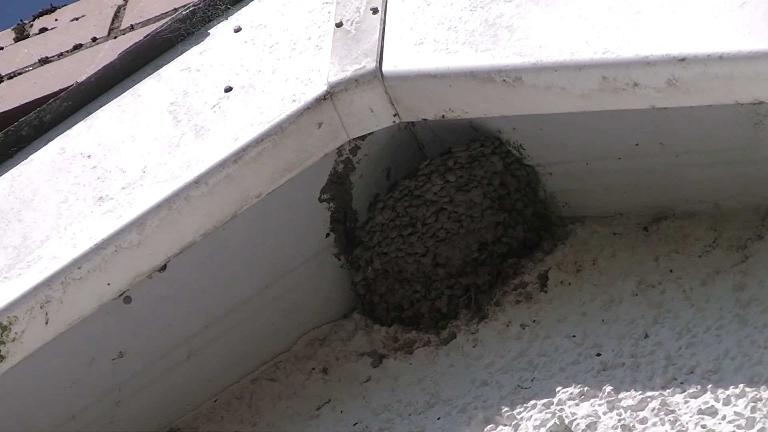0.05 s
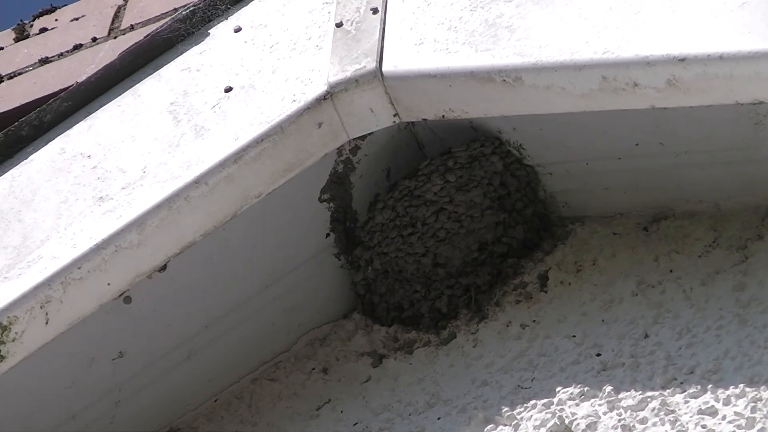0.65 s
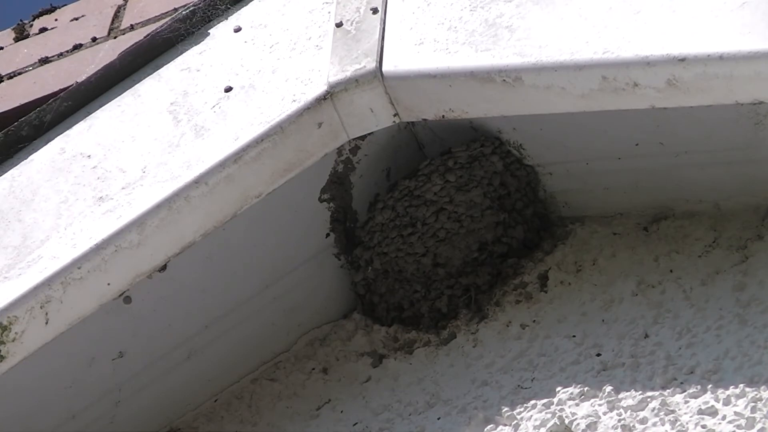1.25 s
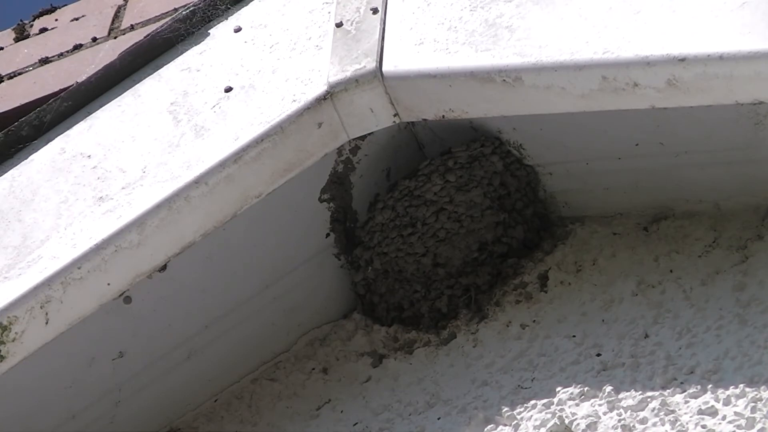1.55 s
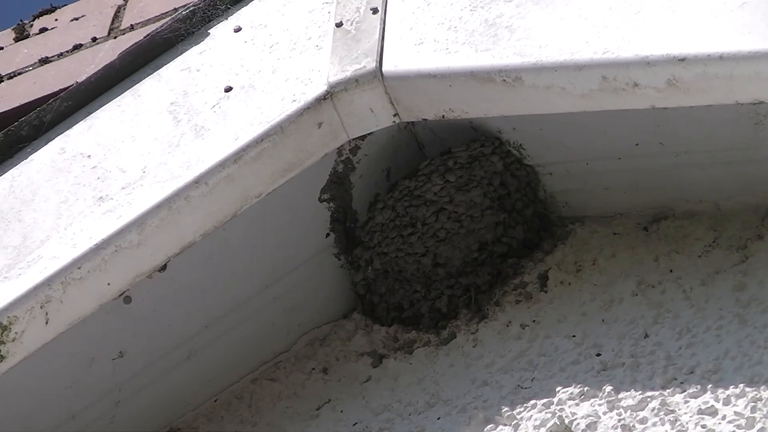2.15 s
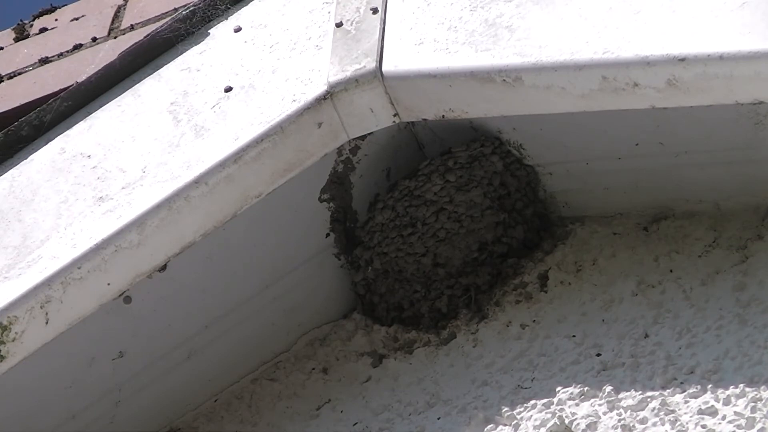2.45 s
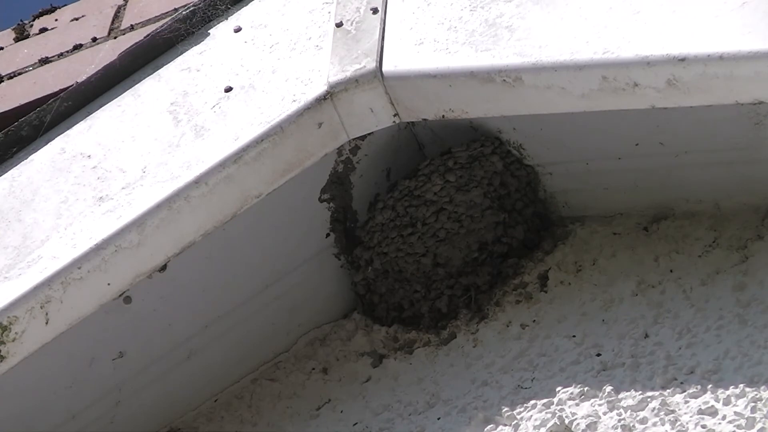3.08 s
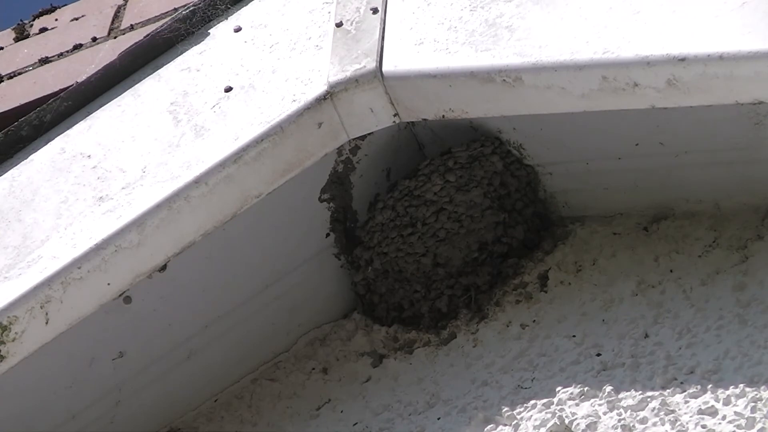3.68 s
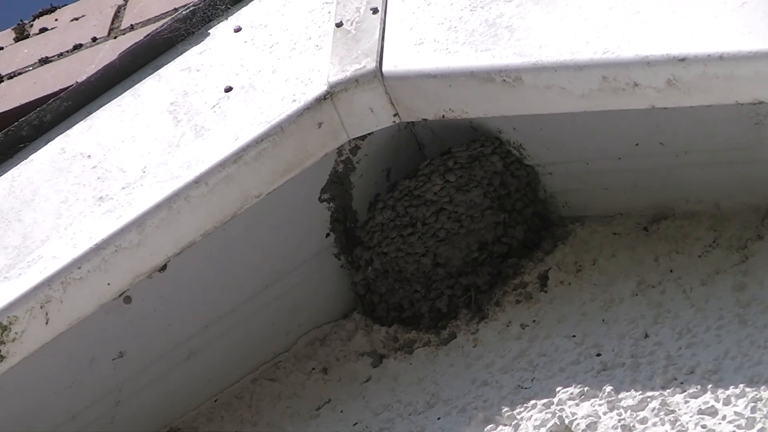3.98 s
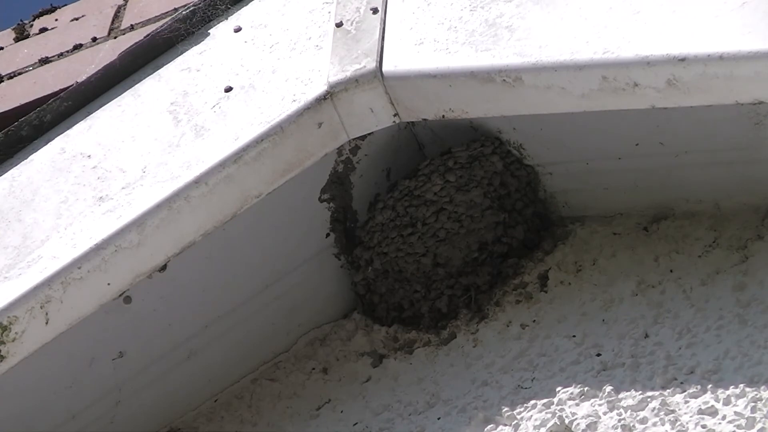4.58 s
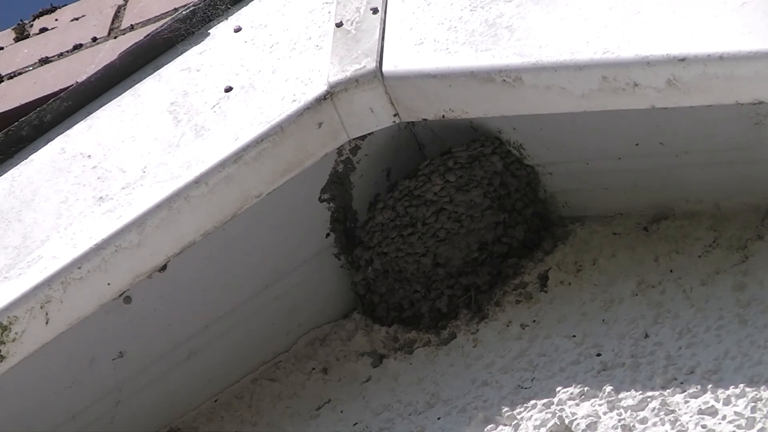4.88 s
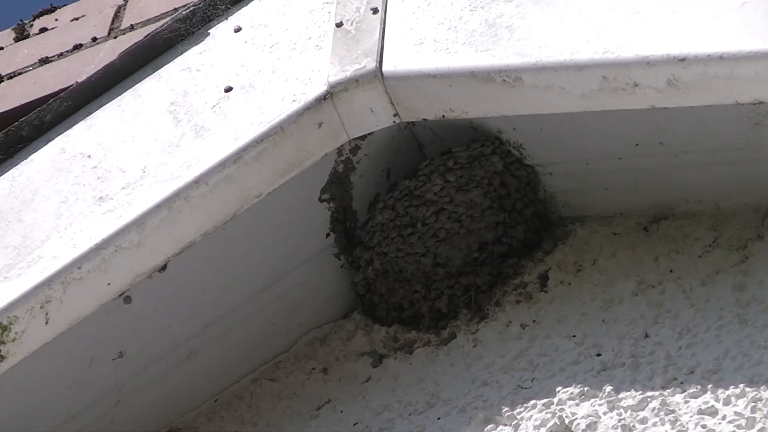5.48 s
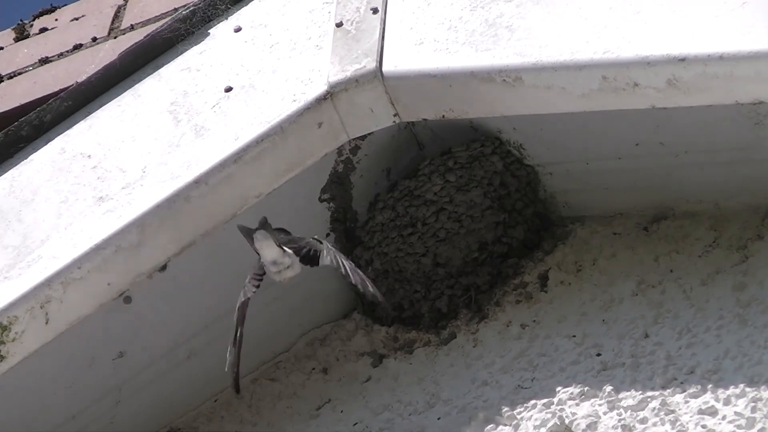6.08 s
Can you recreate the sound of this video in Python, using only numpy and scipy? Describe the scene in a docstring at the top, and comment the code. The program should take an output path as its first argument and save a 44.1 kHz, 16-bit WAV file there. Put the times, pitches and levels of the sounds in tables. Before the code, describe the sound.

Two bursts of quick, high bird twittering over a low machine hum, faint traffic and far birds, ending with a soft flutter.

```python
"""House martins under the eaves

One bird twitters at a mud nest, singing a song of a few motifs twice, the first time ending in a trill.
Its notes are gliding whistles from the two sides of the syrinx. Others rasp farther off among the
houses, and near the end one flutters in and scrabbles onto the nest. Underneath lie a steady low
machine hum, the wash of distant traffic and a light draught on the microphones."""
import sys
import numpy as np
from scipy import signal
from scipy.fft import rfft, irfft, next_fast_len
from scipy.io import wavfile
from scipy.ndimage import uniform_filter1d, map_coordinates

SR = 44100
rng = np.random.default_rng(int(sys.argv[2]) if len(sys.argv) > 2 else 0)


def inscribe(sig):
    """Save sig as 16-bit PCM at rate SR to the path in sys.argv[1].

    A 1-D sig is mono; a 2-D sig holds one channel per row.
    Samples are clipped to [-1, 1] before scaling.
    """
    pcm = np.round(np.clip(np.atleast_2d(sig).T, -1, 1) * 32767)
    wavfile.write(sys.argv[1], SR, pcm.astype(np.int16))


N = 279153

# the machine's tones above the mains note: pitch_hz, level_db
MACHINE_TONES = [(81.5, -50.5), (181, -56.5), (191.2, -41.5), (201.5, -52), (286.7, -55.5)]
# EQ of the traffic wash: frequency_hz, gain_db
WASH_EQ = [(140, -31), (230, -3.5), (400, -1.5), (750, -4.5), (1100, -8), (1600, -13), (2100, -21),
           (2600, -35), (3300, -30.5), (4500, -22), (5600, -24), (8000, -29.5), (12500, -37.5),
           (15600, -83)]
# fader ride on the wash: time_s, level_db
WASH_RIDE = [(0, -37.5), (1.2, -38.5), (2.8, -38), (4.2, -37), (6.33, -37)]
# EQ of the road rumble: frequency_hz, gain_db
RUMBLE_EQ = [(10, -17), (25, -9.5), (45, 2), (65, -12.5), (85, 2), (110, -11), (160, -10.5), (230, -13.5),
             (330, -35.5)]
# stereo image of the noise beds and scrapes: frequency_hz, left_right_correlation
STEREO_LIKENESS = [(30, 0.96), (200, 0.87), (600, 0.9), (1500, 0.63), (3000, 0.69), (4500, 0.44),
                   (8000, 0.49), (12000, -0.11)]
# EQ of the air on the microphones: frequency_hz, gain_db
DRAUGHT_EQ = [(5, -25), (18, 8), (35, 4), (60, -4.5), (90, -18), (130, -15), (300, -53)]
# fader ride on the draught: time_s, level_db
DRAUGHT_RIDE = [(0, -56), (2.8, -37), (4.6, -34), (5.4, -39), (6.33, -27.5)]
# cues for the far birds: start_s, top_pitch_hz, premix_level_db
FAR_CALLS = [(0, 5000, -43), (.06, 5540, -46.5), (.892, 5450, -40.5), (1.68, 5410, -42),
             (2.141, 5900, -43.5), (2.585, 5900, -47), (3.35, 5600, -46), (3.632, 5400, -42),
             (4.164, 5210, -41), (4.604, 5090, -43.5), (4.79, 5000, -54), (5.05, 5100, -43.5),
             (5.229, 5296, -39.5), (5.815, 4820, -47.5)]
# a whistle's octave as the beak passes it: octave_hz, gain_db
BEAK_EQ = [(8000, -38), (10000, -37), (11500, -29.5), (12200, -21), (13500, -38)]
# reverb time between the houses: frequency_hz, t60_s
YARD_DECAY = [(1000, 0.11), (4500, 0.53), (7000, 0.32), (12000, 0.037)]
# cues for the song at the nest, plus one faint lone whistle at 3.925 s: start_s, motif, pitch_ratio,
# premix_level_db
SONG_CUES = [(.818, "opening", 1.01, -36), (1.127, "ladder", 1.018, -31.5), (1.344, "pair", 1.01, -30),
             (1.502, "whistle", 1.005, -23.5), (1.645, "stutter", 1.006, -23.5),
             (1.818, "flourish", 1, -17.5), (3.925, "whistle", .96, -53), (4.889, "opening", 1.015, -35.5),
             (5.2, "ladder", 1.01, -30), (5.42, "pair", 1.003, -30), (5.569, "pair", 1, -29),
             (5.718, "whistle", .997, -20), (5.862, "stutter", 1, -22.3), (6.038, "flourish", 1, -17)]
# syllables by motif; two at once are the two sides of the syrinx:
# delay_s, shape, length_s, pitch_hz, accent_db
MOTIF_SYLLABLES = { "opening": [(0, "rise", 0.0213, 2940, -15), (.107, "rise", .03, 3388, -9.5),
                   (.168, "tsip", .028, 7156, 0), (.169, "tsip", .035, 6090, -3.5),
                   (.217, "chip", .029, 4181, -1)], "ladder": [(0, "rise", .053, 4340, -0.5),
                   (.07, "chip", 0.02179, 3292, -15.5), (.102, "rise", .028, 5305, 1.5),
                   (.105, "chip", .03, 4120, -13), (.16, "tsip", .033, 7280, -5),
                   (.162, "tsip", 0.027, 6110, 0.5)], "pair": [(0, "rise", .056, 4323, -0.5),
                   (.072, "chip", .024, 4825, 3.5)], "whistle": [(0, "whistle", .11, 5940, 0)],
                   "stutter": [(0, "chip", .032, 3700, -17), (.025, "rise", 0.0212, 3470, -17.5),
                   (.072, "tsip", .034, 6810, 0), (.115, "chip", 0.01386, 4530, -7)],
                   "flourish": [(0, "rise", .044, 4603, -7.5), (.068, "flick", .019, 7850, -7),
                   (.075, "tsip", .027, 6980, -14.5), (.107, "slur", .116, 4834, 0)]}
# pitch and level envelopes by shape: length_fraction, pitch_ratio, gain_db
SYLLABLE_SHAPES = { "rise": [(0, .69, -20), (.3, .88, -9.5), (.5, .97, -1.5), (.7, 1.02, -4.5),
                   (.85, 0.95, -5.5), (1, 0.96, -24)], "chip": [(0, .7, -16.5), (.28, .91, -1.5),
                   (.48, 1, 4.5), (.75, 1.09, -7), (1, 1.13, -2)], "tsip": [(0, .955, -15), (.25, .985, -7),
                   (.55, 1, -5.5), (1, 1.025, -24)], "whistle": [(0, .95, -24), (.25, .977, -6),
                   (.45, .995, -1), (.8, 1.008, -12), (1, 1, -6.5)], "flick": [(0, 0.403, -16),
                   (.25, 1, -8), (.5, 0.95, -25), (.75, 1.06, -14.5), (1, 1.07, -13)],
                   "slur": [(0, 1.31, -29), (.2, 1.2, -12.5), (.4, 1.09, -7), (.6, 1.02, -5),
                   (.8, .995, -4), (1, 1, -15)], "dip": [(0, 1.12, -20), (.25, 1.02, -5), (.55, .99, 0),
                   (.8, 1, -1), (1, 1.02, -14)], "hook": [(0, .9, -8), (.17, .96, -2), (.3, 1.02, 1.5),
                   (.38, 1.06, -14), (.48, .87, -3), (.58, .81, -3), (.8, 0.67, -13), (1, 0.57, -24)]}
# noise beside the tone where the voice breaks: shape, sizzle_db
VOICE_SIZZLE = {"hook": -22.5, "flick": -10, "dip": -23}
# cues for wing strokes and claw scrapes: start_s, length_s, level_db
SCRAPE_CUES = [(5.934, .022, -41), (5.977, .018, -44), (6.085, .028, -38.5), (6.108, .026, -40),
               (6.127, .028, -38), (6.173, .032, -36), (6.293, .02, -46)]
# EQ of feathers and claws on dry mud: frequency_hz, gain_db
SCRAPE_EQ = [(300, -27), (1500, -7), (4500, 0), (7500, -9), (10000, 1.5), (12000, -14), (15500, -23)]

RASP_S, SECOND_RASP_DELAY_S, SECOND_RASP_RATIO, SECOND_RASP_DB = .039, .093, .9, -5.5
TRILL_START_S, FIRST_BEAT_S, SLOWING_PER_BEAT_S = 2.184, .0824, .00078
TRILL_DB, TRILL_TAPER_DB = -28, 1.5  # premix level in the middle; how much softer the ends are


def amp(db):
    """Decibels to gain."""
    return 10 ** (np.asarray(db) / 20)


def unit(x):
    """Scaled to rms 1."""
    return x / np.sqrt(np.mean(x ** 2) + 1e-20)


def along(points, hz):
    """Reads frequency_hz, value rows on a log frequency axis."""
    freqs, values = np.transpose(points)
    return np.interp(np.log(hz + 1), np.log(freqs + 1), values)


def ride(rows):
    """A fader ride: time_s, level_db rows as one level per sample."""
    return np.interp(np.arange(N) / SR, *np.transpose(rows))


def wobble(rate_hz, size=N):
    """Smooth random modulation, rate_hz knots a second."""
    knots = rng.standard_normal(int(size * rate_hz / SR) + 4)
    return map_coordinates(knots, [np.arange(size) * rate_hz / SR])


def filtered(x, response):
    """Plays x through a frequency response."""
    size = next_fast_len(N + SR // 2)
    return irfft(rfft(x, size) * response(np.fft.rfftfreq(size, 1 / SR)), size)[..., :N]


def add(track, start_s, sound):
    """Lays a sound into a track."""
    i = max(0, round(start_s * SR))
    track[i:i + len(sound)] += sound[:N - i]


def stereo_noise(eq):
    """Noise of rms 1 through an EQ, nearly mono in the bass and wide on top."""
    def mid_side_gains(hz):
        width = np.arccos(np.clip(along(STEREO_LIKENESS, hz), -1, 1)) / 2
        return amp(along(eq, hz)) * np.array([np.cos(width), np.sin(width)])
    mid, side = filtered(rng.standard_normal((2, N)), mid_side_gains)
    return unit(np.array([mid + side, mid - side]))


def machine_hum(mains_hz=59.6, mains_db=-28, octave_db=-23, drift_hz=.88):
    """A machine hums at mains pitch, with slightly unsteady tones above it."""
    phase = 2 * np.pi * np.cumsum(mains_hz + .24 * wobble(4.09)) / SR
    gain = amp(mains_db + .25 * wobble(1.499) + .3 * wobble(12))
    octave = amp(octave_db + 1.19 * wobble(6.095)) * np.sin(2 * phase)
    mains = gain * (np.sin(phase) + octave)
    drone = np.zeros(N)
    for hz, db in MACHINE_TONES:
        swell = amp(db + 1.8 * wobble(12))
        drone += swell * np.sin(2 * np.pi * np.cumsum(hz + drift_hz * wobble(8)) / SR)
    return np.sqrt(2) * (mains + drone)


def traffic(swell_db=.13, rumble_db=-41):
    """Distant roads: an even wash on a bed of low rumble."""
    wash = amp(ride(WASH_RIDE) + swell_db * wobble(3.26)) * stereo_noise(WASH_EQ)
    return wash + amp(rumble_db) * stereo_noise(RUMBLE_EQ)


def draught(gust_db=3, common_db=-8):
    """Light air eddies at the microphone ports, pushing them mostly out of phase."""
    eddies = filtered(rng.standard_normal((2, N)), lambda hz: amp(along(DRAUGHT_EQ, hz)))
    opposed, common = unit(eddies)
    gusts = amp(ride(DRAUGHT_RIDE) + gust_db * wobble(4.17))
    return gusts * (np.array([opposed, -opposed]) + amp(common_db) * common)


def whistle(pitch_hz, level_db, fade_s=.001):
    """One side of the syrinx: a sine with a weak octave and soft ends."""
    phase = 2 * np.pi * np.cumsum(pitch_hz) / SR
    t = np.arange(len(phase)) / SR
    fades = np.clip(np.minimum(t, t[-1] - t) / fade_s, 0, 1)
    octave = amp(along(BEAK_EQ, 2 * pitch_hz)) * np.sin(2 * phase)
    return np.sqrt(2) * fades * amp(level_db) * (np.sin(phase) + octave)


def rasp(hz, db, sweep, buzz_hz=62, fade_db=4, scatter=.0149):
    """A whistle turned buzzy by a fast, uneven run of little downward sweeps."""
    t = np.arange(int(RASP_S * SR)) / SR
    ramp = (buzz_hz * t + .152 * wobble(60.3, len(t))) % 1
    droop = (1 - sweep * ramp ** 2) * (1 + scatter * wobble(244, len(t)))
    swell_db = np.interp(t / RASP_S, [0, .2, 1], [-7, 5, -2])
    return whistle(hz * droop, db + swell_db - fade_db * ramp)


def far_birds(lead_s=.037, lead_hz=7000, lead_db=-10):
    """Each call is a thin high note, a rasp, and a second rasp that is lower and softer."""
    calls = np.zeros(N)
    for start_s, hz, db in FAR_CALLS:
        add(calls, start_s - lead_s, rasp(lead_hz, db + lead_db, sweep=.17))
        add(calls, start_s, rasp(hz, db, sweep=.2))
        second = rasp(hz * SECOND_RASP_RATIO, db + SECOND_RASP_DB, sweep=.3)
        add(calls, start_s + SECOND_RASP_DELAY_S, second)
    return calls


def yard_reverb(sound, build_s=.01):
    """The diffuse echo between the houses; it rings longest in the birds' range, briefly on top."""
    hz, t, spectrum = signal.stft(rng.standard_normal((2, SR * 3 // 4)), SR, nperseg=256)
    decay = amp(-60 * t / along(YARD_DECAY, hz)[:, None])
    bloom = 1 - np.exp(-t / build_s)
    _, tail = signal.istft(spectrum * decay * bloom, SR, nperseg=256)
    return signal.fftconvolve(sound[None], tail / np.linalg.norm(tail[0]), axes=1)[:, :N]


def nest_singer():
    """The bird at the nest, and one faint lone whistle: each syllable arrives direct (mono) and off the eaves
    (stereo)."""
    direct, reflected = np.zeros(N), np.zeros((2, N))
    for start_s, *note in song_notes() + trill_notes():
        sound = syllable(*note)
        add(direct, start_s, sound)
        for channel in reflected:
            add(channel, start_s, eaves_echo(sound))
    return direct, reflected


def song_notes():
    """Each motif unfolds into syllables: start_s, shape, length_s, pitch_hz, premix_level_db."""
    return [(start_s + delay_s, shape, length_s, hz * ratio, db + accent_db)
            for start_s, motif, ratio, db in SONG_CUES
            for delay_s, shape, length_s, hz, accent_db in MOTIF_SYLLABLES[motif]]


def syllable(shape, length_s, hz, db, waver=.015, flutter_db=3):
    """Pitch and effort glide through a shape; short notes are rough, and some break into sizzle."""
    size = int(length_s * SR)
    progress = np.linspace(0, 1, size)
    fraction, ratio, gain_db = np.transpose(SYLLABLE_SHAPES[shape])
    roughness = min(1, .059 / length_s) ** 3
    glide = uniform_filter1d(np.interp(progress, fraction, ratio), size=100, mode="nearest")
    effort_db = db + np.interp(progress, fraction, gain_db) + roughness * flutter_db * wobble(414, size)
    tone = whistle(hz * glide * (1 + roughness * waver * wobble(710, size)), effort_db)
    band = signal.butter(2, [6500, 12000], "bandpass", fs=SR, output="sos")
    sizzle = unit(signal.sosfilt(band, rng.standard_normal(size)))
    return tone + amp(effort_db + VOICE_SIZZLE.get(shape, -34)) * sizzle


def eaves_echo(sound, predelay_s=.0044, wall_t60_s=.098, roof_t60_s=.33, roof_db=-10):
    """Wall and soffit scatter a short echo, the roofs a longer one, anew with each turn of the head."""
    t = np.arange(SR // 5) / SR
    decay = (amp(-60 * t / wall_t60_s) + amp(roof_db - 60 * t / roof_t60_s)) * (t > predelay_s)
    echo = signal.fftconvolve(sound, rng.standard_normal(len(t)) * decay)
    return echo * np.linalg.norm(sound) / np.linalg.norm(echo)


def trill_notes(beats=9, scatter=.012, dip_hz=6600, dip_db=-2,
                hook_hz=5000, hook_delay_s=.013, hook_length_s=.044,
                upbeat_s=.049, upbeat_hz=3890, upbeat_db=-9):
    """A chip leads into a slowing run of beats; each is a high dip answered by a lower hook."""
    notes = [(TRILL_START_S - upbeat_s, "chip", .02, upbeat_hz, TRILL_DB + upbeat_db)]
    detunes = 1 + scatter * rng.standard_normal((beats, 2))
    for k, (dip_ratio, hook_ratio) in enumerate(detunes):
        start_s = TRILL_START_S + k * FIRST_BEAT_S + SLOWING_PER_BEAT_S * k * (k - 1) / 2
        db = TRILL_DB - TRILL_TAPER_DB * (2 * k / (beats - 1) - 1) ** 2
        notes.append((start_s, "dip", .015, dip_hz * dip_ratio, db + dip_db))
        notes.append((start_s + hook_delay_s, "hook", hook_length_s, hook_hz * hook_ratio, db))
    return notes


def landing(grain_db=4, echo_db=-5):
    """Feathers and claws brush the dry mud in short grainy strokes."""
    strokes = np.zeros(N)
    for start_s, length_s, db in SCRAPE_CUES:
        add(strokes, start_s, amp(db) * np.hanning(int(length_s * SR)))
    grain = amp(grain_db * wobble(900))
    rustle = strokes * unit(grain * stereo_noise(SCRAPE_EQ))
    return rustle + amp(echo_db) * np.array([eaves_echo(side)[:N] for side in rustle])


def scene(near_left_db=3, left_lead_s=.00002, eaves_db=-2.5, yard_db=-14,
          far_right_db=.5, far_direct_db=-5, far_yard_db=-1):
    """The mix: the singer close and to the left, the far birds slightly right and mostly reverb."""
    song, reflected = nest_singer()
    far = far_birds()
    leftward = np.array([[1], [-1]])
    direct = filtered(song, lambda hz: np.exp(np.pi * 1j * hz * left_lead_s * leftward))
    near = amp(near_left_db * leftward) * (direct + amp(eaves_db) * reflected)
    near += amp(yard_db) * yard_reverb(song)
    distant = amp(far_direct_db) * far + amp(far_yard_db) * yard_reverb(far)
    colony = amp(-far_right_db * leftward) * distant
    return near + colony + landing() + machine_hum() + traffic() + draught()


def record(dry, dull_hz=14500, top_hz=15800):
    """The microphone dulls the very top, and a hard band limit cuts everything above top_hz."""
    return filtered(dry, lambda hz: (hz < top_hz) / np.sqrt(1 + (hz / dull_hz) ** 20))


dry = scene()
out = record(dry)
inscribe(out)
```